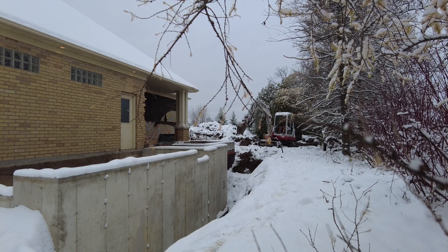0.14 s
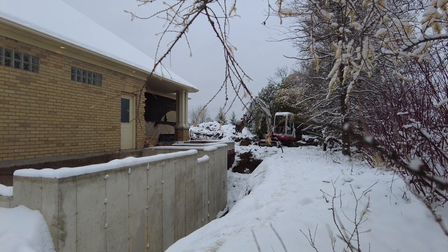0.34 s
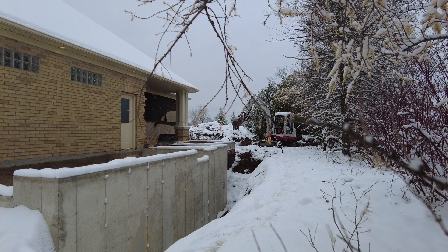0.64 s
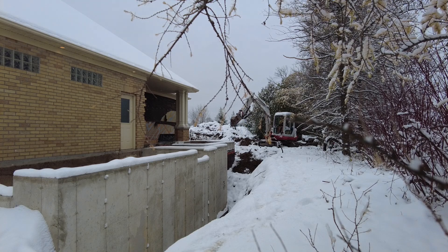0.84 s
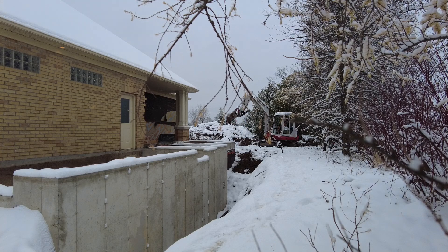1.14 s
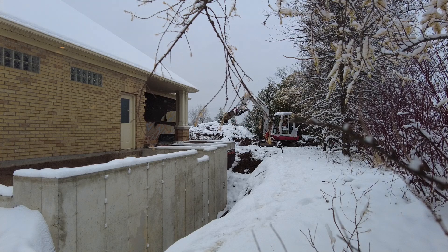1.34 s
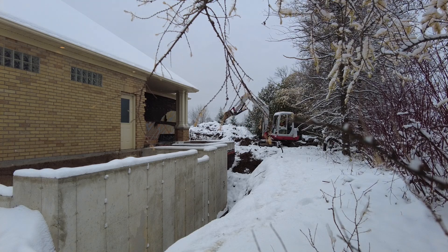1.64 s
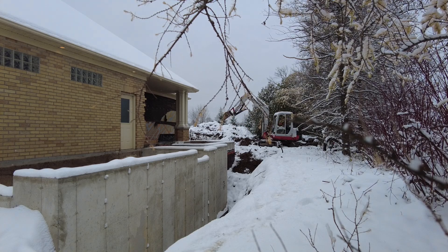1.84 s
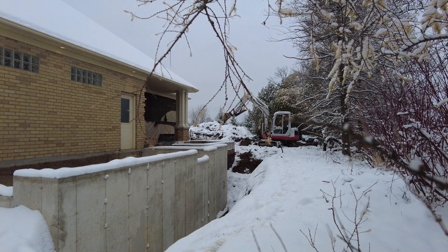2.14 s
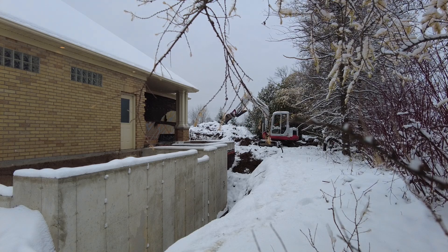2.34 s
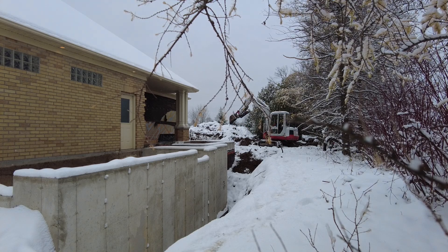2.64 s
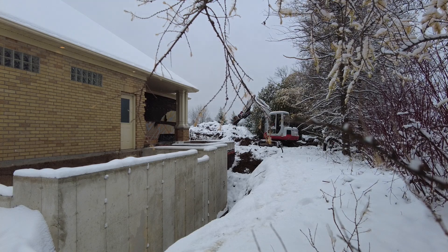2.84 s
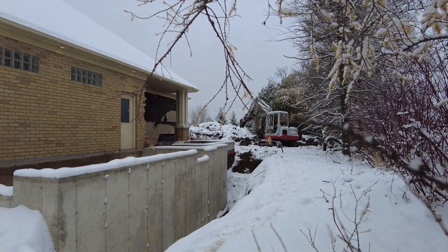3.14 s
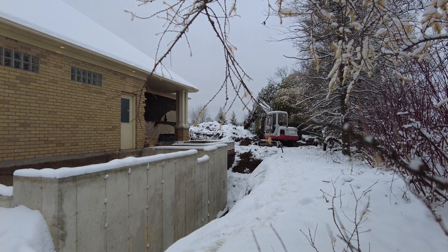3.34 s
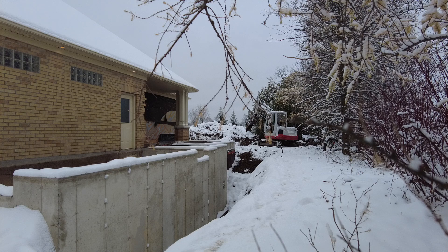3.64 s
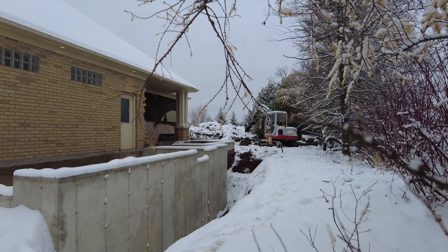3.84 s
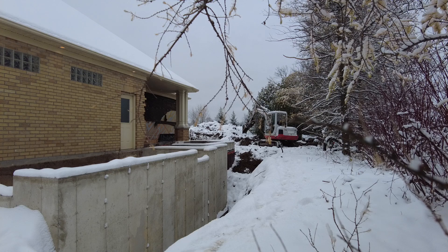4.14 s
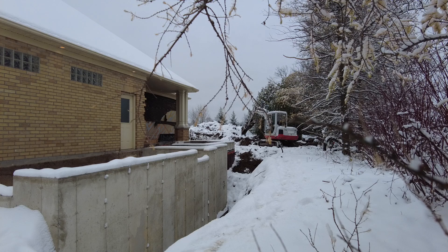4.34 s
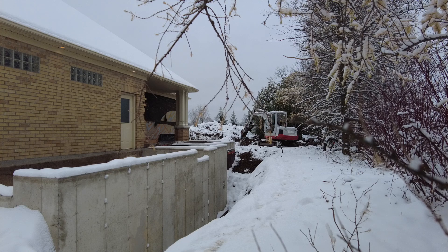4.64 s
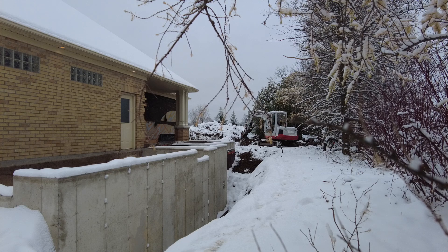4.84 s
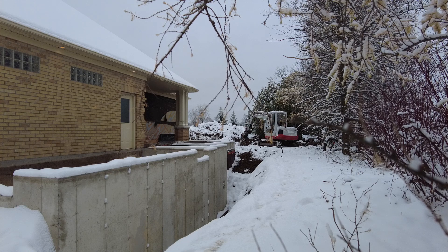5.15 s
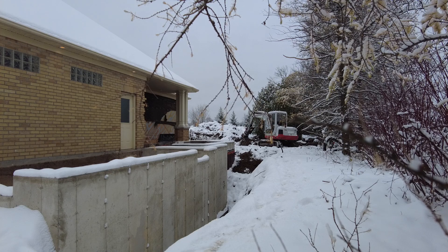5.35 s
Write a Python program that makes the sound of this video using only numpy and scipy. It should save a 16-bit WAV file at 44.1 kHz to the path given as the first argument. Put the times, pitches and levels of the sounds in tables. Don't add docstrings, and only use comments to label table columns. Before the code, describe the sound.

Low throbbing diesel engine hum with rattly fan noise and thin pump whine, easing off around the middle, with tiny metallic ticks.

```python
import sys
import numpy as np
from scipy import signal
from scipy.fft import rfft, irfft, next_fast_len
from scipy.io import wavfile
from scipy.ndimage import uniform_filter1d, map_coordinates

SR = 44100
rng = np.random.default_rng(int(sys.argv[2]) if len(sys.argv) > 2 else 0)


def to_linear_factor(level_db):
    exponent = np.asarray(level_db, float) / 20
    return 10 ** exponent


def dump_mix(stems):
    frames = np.atleast_2d(stems).T
    limited = np.clip(frames, -1, 1)
    pcm = np.round(limited * 32767).astype(np.int16)
    wavfile.write(sys.argv[1], SR, pcm)


N = 242991


def in_time(rows):
    times_s, *columns = np.transpose(rows)
    return [np.interp(np.arange(N) / SR, times_s, column) for column in columns]


def at_hz(rows, hz):
    table_hz, *columns = np.transpose(rows)
    return [np.interp(np.log(hz), np.log(table_hz), column) for column in columns]


def drift(rate_hz):
    hop = 40
    pole = np.exp(-2 * np.pi * rate_hz * hop / SR)
    noise = rng.standard_normal(N // hop + 2002)
    slow = signal.lfilter([1], [1, -2 * pole, pole * pole], noise)[2000:]
    return np.interp(np.arange(N) / hop, np.arange(len(slow)), slow / slow.std())


def tone(phase, level_db, flutter_db):
    return np.sqrt(2) * to_linear_factor(level_db + flutter_db * drift(8.3)) * np.cos(phase)


def spells(rows):
    edge_s, rest_db = .04, -76
    t = np.arange(N) / SR
    held = 0
    for start_s, length_s, db in rows:
        to_edge_s = np.minimum(t - start_s, start_s + length_s - t)
        held = held + to_linear_factor(db) * np.clip(to_edge_s / edge_s + .5, 0, 1)
    return 20 * np.log10(held + to_linear_factor(rest_db))


# (time [s], firing rate [Hz])
SPEED_HZ = [(0, 69.85), (.6, 70.05), (.95, 69.5), (1.5, 70.25), (2.31, 70.9), (2.39, 73.5), (2.5, 73.4),
            (2.63, 72.65), (3.25, 71.25), (3.52, 69.95), (3.87, 69.95), (4.0, 69.15), (4.2, 70.1),
            (4.6, 70.6), (5.0, 70.45), (5.2, 72.1), (5.3, 71.2), (5.51, 66.7)]


def firing_rate():
    return in_time(SPEED_HZ)[0]


# (time [s], firing tone [dB], octave [dB])
EFFORT_DB = [(0, -30, -46.5), (.5, -29.5, -47), (1.0, -30.5, -47), (1.45, -32, -45), (1.78, -33.5, -46),
             (2.25, -38, -49), (2.36, -40, -47.5), (2.4, -45.5, -51), (2.52, -47.5, -48.5),
             (2.7, -43.5, -47.5), (3.15, -37.5, -48), (3.6, -33.5, -43.5), (4.0, -31.5, -42.5),
             (4.25, -33, -45.5), (5.0, -33, -44), (5.27, -37, -47), (5.42, -30.5, -41.5), (5.51, -32, -43)]
# (time [s], 2nd order lead [rad], 3rd order lead [rad])
SWING_RAD = [(0, -.4, .2), (.8, 0, .2), (2.3, 2.2, 1.8), (2.6, .9, -.1), (3.3, 1.5, -.7), (5.51, 1.6, -1)]
# (start [s], length [s], level [dB])
TAILPIPE_OPEN = [(.85, 0.37, -75), (1.3, 1, -65.5), (2.5, 0.39, -63), (2.95, .5, -55.5), (3.45, .9, -56),
                 (4.55, 1.1, -60.5)]
# (multiple of firing rate [1], level [dB])
FAINT_ORDERS = [(0.502, -70.5), (.65, -64), (0.751, -69.5), (1.502, -80.5), (1.75, -66), (4, -68)]


def exhaust(phase):
    first_db, second_db = in_time(EFFORT_DB)
    third_db = spells(TAILPIPE_OPEN)
    lead2, lead3 = in_time(SWING_RAD)
    hum = tone(phase, first_db, 0.22)
    hum += tone(2 * phase + lead2, second_db, 0.15)
    hum += tone(3 * phase + lead3 + .5 * drift(8.3), third_db, 1.0)
    hum += tone(11 / 4 * phase + drift(3), third_db - 7, 3.0)
    for order, db in FAINT_ORDERS:
        hum += tone(order * phase + 1.42 * drift(1.8), db, 3.1)
    return hum


# (time [s], level [dB])
PUMP_DB = [(0, -50.5), (.92, -53.5), (1.04, -59), (1.12, -64), (1.24, -66), (1.33, -59), (1.84, -59.5),
           (2.33, -55), (2.39, -62.5), (2.62, -61), (2.72, -54), (4.04, -54.5), (4.4, -57.5), (4.48, -70),
           (4.6, -65), (4.8, -66), (5.17, -57), (5.26, -66), (5.33, -53), (5.51, -58)]
WHINE_ORDERS = [10, 12.5, 15, 17.5, 25]
# (start [s], length [s], level [dB])
WHINES = [
    [(2.1, .26, -64), (2.57, .36, -62), (2.97, .17, -60.5), (3.58, .1, -65), (3.3, .15, -67),
     (4.5, .5, -66), (5.4, .12, -64)],
    [(3.5, .3, -66), (3.8, .4, -62.5), (4.25, .1, -67), (5.35, .1, -66)],
    [(0, .56, -67.5), (1.5, .15, -68), (2.4, .3, -68), (2.97, .34, -62.5), (3.85, .35, -65),
     (5.2, .32, -64.5)],
    [(.1, .4, -70), (.82, .2, -70), (1.95, .4, -68), (2.5, .5, -67)],
    [(3.6, .35, -68), (3.95, .85, -64.5), (4.8, .4, -67)],
]


def hydraulics(phase):
    orders = [5, *WHINE_ORDERS]
    levels_db = in_time(PUMP_DB) + [spells(rows) for rows in WHINES]
    out = np.zeros((2, N))
    for order, db in zip(orders, levels_db):
        lag_rad = .13 / order * drift(1.2) * [[1], [-1]]
        wander_rad = .04 * order * drift(7) + .038 * (order - 5) * drift(30)
        out += tone(order * (phase + lag_rad) + wander_rad, db, .8 + .06 * order)
    return out


CYLINDERS_DB = [2.2, 0.0, -.6, -1.6]


def firing_beat(phase):
    firing = (phase / (2 * np.pi) + .5).astype(int)
    chance_db = .6 * rng.standard_normal(firing.max() + 1)
    strength_db = np.array(CYLINDERS_DB)[firing % 4] + chance_db[firing]
    return np.cos(phase + 0.087), uniform_filter1d(strength_db, size=200)


def cycle_noise(phase, size):
    steps = 2520
    cycle_memory = .7
    each_turn = .4
    knock_db = 1.5
    place = phase / (8 * np.pi) * steps
    fresh = rng.standard_normal((int(place[-1] / steps) + 22, steps))
    turns = np.tile(rng.standard_normal((len(fresh), steps // 2)), 2)
    fresh = np.sqrt(1 - each_turn) * fresh + np.sqrt(each_turn) * turns
    cycles = signal.lfilter([1], [1, -cycle_memory], fresh, axis=0)[20:]
    since_firing = (phase / (2 * np.pi) + 0.17) % 1
    clatter = map_coordinates(cycles.ravel(), [place], order=3) * to_linear_factor(-2 * knock_db * since_firing)
    return rfft(clatter / clatter.std(), size)


# (frequency [Hz], left-right likeness [0-1], lead of right [rad])
PORTS = [(35.2, 0.94, 0.1), (68, .75, 0.19), (120, 0.99, 0.21), (192, 0.96, 0.29), (500, 0.8, 0.56),
         (840, 0.64, 0.97), (960, 0.5, 1.04), (1450, 1, 0.14), (1730, 0.83, 0.28), (2240, 0.88, 0.41),
         (2900, 0.67, 0.27), (3630, 0.46, 0.23), (5630, 0.26, 1.04), (9000, 0.32, 0.68), (11500, 0.34, 1.7),
         (13900, 0.3, 1.3)]
# (frequency [Hz], level [dB])
LEAN_DB = [(40, 1), (110, -0.5), (200, 0), (380, 0.5), (700, 1), (1290, 0.5), (2380, -1), (4400, -1.0),
           (8120, -1.5), (15000, -1.5)]


def at_ports(mid, side, hz):
    likeness, lead_rad = at_hz(PORTS, hz)
    lean_db, = at_hz(LEAN_DB, hz)
    alike = np.clip(likeness, 0, 1)
    sign = np.array([[1], [-1]])
    pair = np.sqrt(1 + alike) * mid + np.sqrt(1 - alike) * side * sign
    return pair * to_linear_factor(sign * lean_db / 2) * np.exp(-.5j * sign * lead_rad)


def panel_gain(peaks, hz):
    peaks_db = sum(db / (1 + np.abs(2 * (hz - centre) / width) ** 3) for centre, width, db in peaks)
    diffuse_share = .5
    return to_linear_factor(np.array([[1], [diffuse_share]]) * peaks_db)


# (frequency [Hz], density [dB per Hz])
NOISE_COLOUR = [(18, 15), (50, 19), (100, 12.5), (170, 9), (215, 5), (260, 2), (330, -3.5),
                (380, -0.5), (587, -1.5), (708, 0), (951, 0.5), (1260, 1), (2490, -4.5), (2820, -2),
              (3850, -12), (7750, -21), (8510, -23), (9340, -23.5), (15600, -27.5)]
# (frequency [Hz], power repeating each cycle [0-1])
REPEAT = [(90, 0), (200, .2), (500, .4), (900, .36), (1250, .3), (1800, .7), (2800, .66), (4200, .2),
          (6000, 0)]
# (frequency [Hz], width [Hz], level [dB])
PANELS_HIDDEN = [(1188, 39, -8), (1192, 46, 4.5), (2760, 280, -1.5), (4310, 86, 7), (6230, 990, 4.5),
                 (7700, 710, 6), (9360, 430, 5.5), (10800, 400, 1.5), (11600, 400, -3), (12800, 600, 6)]
PANELS_FACING = [(1190, 32, -6), (1250, 99, 2), (1800, 780, 1.5), (2570, 280, -1), (3700, 550, -2.5),
                 (4280, 300, 1.5), (5080, 350, -3.5), (6150, 600, 2), (7700, 420, 6.5), (9370, 490, 7),
                 (10900, 600, 2), (12400, 620, 6), (13100, 500, -2.5), (14600, 900, 2)]
# (time [s], share [0-1])
FACING = [(0, 0), (2.7, 0), (3.4, 1), (5.51, 1)]
# (time [s], level [dB])
OPENING_DB = [(0, 2.5), (.1, 2), (1.2, 3), (1.5, 5), (1.6, 6), (1.85, 6.5), (1.95, 6.5), (2.25, 6.5),
              (2.55, 5), (2.9, 6), (3.2, 8.5), (3.6, 9.5), (4.4, 9), (5.25, 9.5), (5.34, 8), (5.4, 9.5),
              (5.51, 9.5)]
# (frequency [Hz], opening [dB per dB], sag [dB per Hz], facing [dB])
BAY_FOLLOWS = [(40, 0, 0.3, -2), (110, 1.5, -0.3, -4.5), (310, 0.1, 0.1, 0), (700, 0.39, -0.3, 2),
               (2470, 1.31, -0.26, -2), (7000, 0.9, 0.45, 2), (10000, 0.84, 0.8, 2), (15000, 0.5, 0.5, 3)]
# (frequency [Hz], firing swing behind cab [dB], firing swing facing [dB], flicker [dB])
THROB = [(300, -.6, -.6, 1), (900, .65, .35, .85), (1700, .9, .35, .6), (3200, 1.1, 1.2, .7),
         (6000, .9, .75, .85), (11000, 1.1, 1.1, 1)]


def engine_bay(phase):
    level_db, diffuse_patchy_db = -45.5, 1.2
    free_running_hz, full_load_sag_hz = 73.4, 3.8
    size = next_fast_len(N)
    hz = np.maximum(np.fft.rfftfreq(size, 1 / SR), 1)
    mid, side = rfft(rng.standard_normal((2, size)))
    repeat, = at_hz(REPEAT, hz)
    mid = np.sqrt(1 - repeat) * mid + np.sqrt(repeat) * cycle_noise(phase, size)
    colour_db, = at_hz(NOISE_COLOUR, hz)
    left, right = at_ports(mid, side, hz) * to_linear_factor(colour_db) * (hz > 14)
    direct_diffuse = np.array([left + right, left - right])
    hidden = direct_diffuse * panel_gain(PANELS_HIDDEN, hz)
    shown = direct_diffuse * panel_gain(PANELS_FACING, hz)

    facing, = in_time(FACING)
    opening_db, = in_time(OPENING_DB)
    sag_hz = np.minimum(free_running_hz - firing_rate(), full_load_sag_hz)
    turns = np.array([opening_db, sag_hz, facing])
    turns -= turns.mean(axis=1, keepdims=True)
    swell, strength_db = firing_beat(phase)
    together = drift(5.0)
    out = 0
    for centre in 20 * 2 ** np.arange(0, 10.1, .5):
        window = np.cos(np.pi / 2 * np.clip(2 * np.log2(hz / centre), -1, 1)) ** 2
        band = (1 - facing) * irfft(hidden * window, size)[:, :N]
        band += facing * irfft(shown * window, size)[:, :N]
        behind_db, front_db, flicker_db = at_hz(THROB, centre)
        depth_db = behind_db + facing * (front_db - behind_db)
        gain_db = np.array(at_hz(BAY_FOLLOWS, centre)) @ turns
        gain_db += depth_db * (swell + .3 * strength_db)
        gain_db += .1 * together + flicker_db * drift(22)
        diffuse = to_linear_factor(diffuse_patchy_db * drift(9.3)) * band[1] * [[1], [-1]]
        out = out + to_linear_factor(gain_db) * (band[0] + diffuse)
    return to_linear_factor(level_db) * out / out.std()


# (time [s], frequency [Hz], level [dB])
VALVE = [(.38, 15400, -86), (.44, 15400, -77), (.58, 15400, -77.5), (.66, 15350, -74), (.72, 15350, -74),
         (.76, 14800, -73.5), (.785, 14750, -74), (.8, 14100, -74), (.86, 13950, -75), (.89, 13300, -78),
         (1.0, 13000, -80), (1.1, 12900, -88)]


def valve():
    width_hz = 200
    hz, db = in_time(VALVE)
    lowpass = signal.butter(2, width_hz, fs=SR, output="sos")
    out = 0
    for offset_hz in [-380, 60, 360]:
        rough = signal.sosfilt(lowpass, rng.standard_normal((3, N)))
        rough = rough[0] + 0.76 * rough[1:]
        carrier = np.cos(2 * np.pi * np.cumsum(hz + offset_hz) / SR)
        out = out + to_linear_factor(2.5 * drift(10)) * rough / rough.std() * carrier
    return to_linear_factor(db - 6.0) * (db > db.min()) * out


# (time [s], peak [dB], pitch [Hz])
TICKS = [(0.595, -45, 7500), (1.1603, -41, 7200), (1.232, -47, 9000), (1.3194, -44, 6800),
         (1.4174, -39, 5000), (1.932, -45, 7000), (2.323, -38, 5030), (2.488, -37, 5870),
         (2.656, -43, 7000), (2.722, -40, 6000), (2.807, -40, 6300), (3.492, -42, 9500), (3.607, -33, 5000),
         (3.748, -39, 4700), (3.865, -50, 10800), (3.936, -37, 7700), (4.167, -41, 4500),
         (4.706, -37, 7000), (4.857, -40, 5000), (5.036, -44, 7000)]


def ticks():
    decay_s, span = .006, 1.3
    length = round(8 * decay_s * SR)
    decay = np.exp(-np.arange(length) / (decay_s * SR))
    out = np.zeros(N)
    for start_s, db, hz in TICKS:
        puff = rng.standard_normal(length) * decay
        band = signal.butter(2, [hz / span, hz * span], "band", fs=SR, output="sos")
        out[round(start_s * SR):][:length] += to_linear_factor(db - 13.5) * signal.sosfilt(band, puff)
    return out


def scene():
    phase = 2 * np.pi * np.cumsum(firing_rate()) / SR + 5.1
    return exhaust(phase) + hydraulics(phase) + engine_bay(phase) + valve() + ticks()


def top_cut(x):
    return signal.sosfilt(signal.butter(12, 15750, fs=SR, output="sos"), x)


def record(dry):
    return top_cut(dry)


dry = scene()
out = record(dry)
dump_mix(out)
```